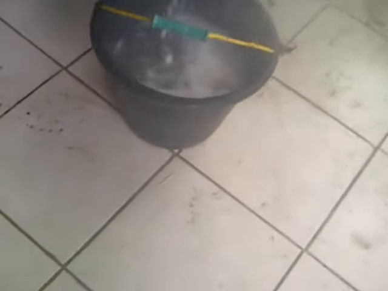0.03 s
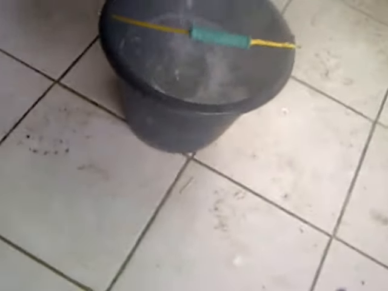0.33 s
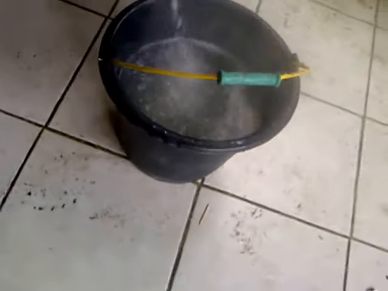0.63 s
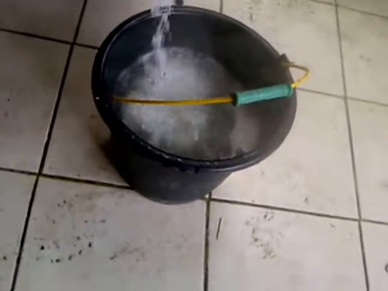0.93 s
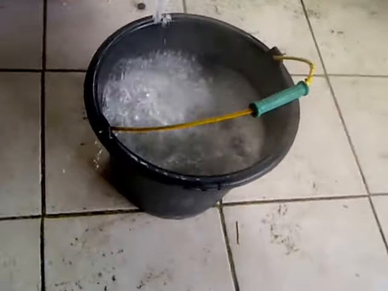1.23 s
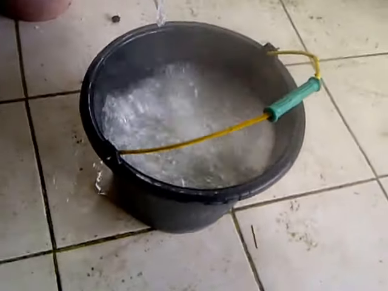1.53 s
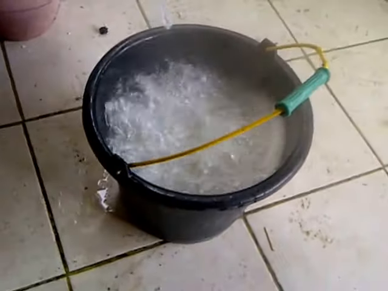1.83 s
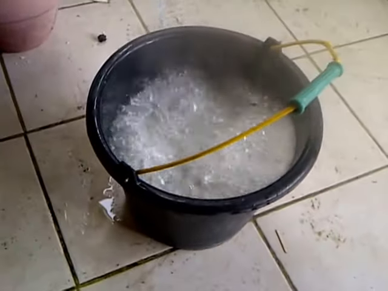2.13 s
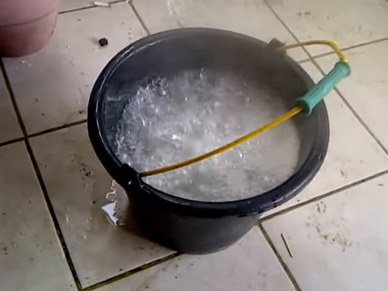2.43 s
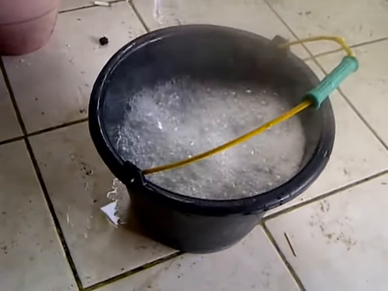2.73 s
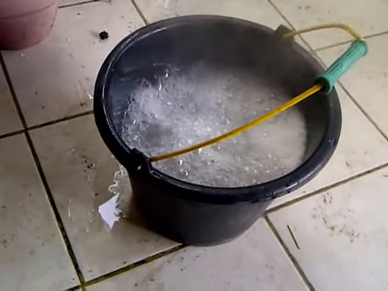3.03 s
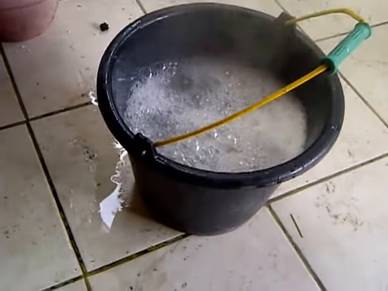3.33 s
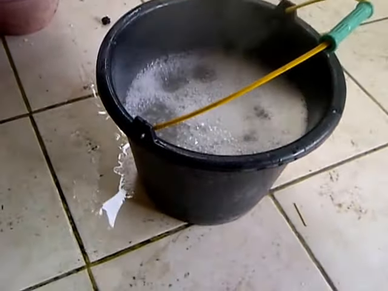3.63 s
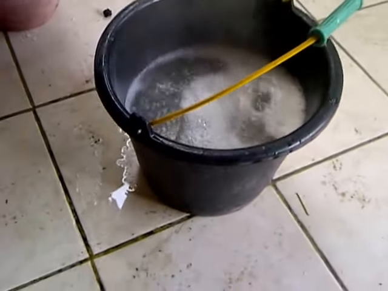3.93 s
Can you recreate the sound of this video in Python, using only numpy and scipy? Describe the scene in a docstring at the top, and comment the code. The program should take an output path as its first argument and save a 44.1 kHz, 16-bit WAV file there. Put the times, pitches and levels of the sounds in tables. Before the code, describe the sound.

Water pours into a plastic bucket, pattering lightly at first while stray drops slap plastic and tile. A hard clack comes at 0.15 seconds, a faint brief whistle at 0.6 and a dull knock at 0.8, the hits echoing briefly in the tiled room. From 1 second the pour swells, bubbling, glugging and fizzing. After 2.4 seconds it thins to a stop, leaving foam sizzling softly until 4 seconds.

```python
"""A stream of steaming water falls into a plastic bucket on a tiled floor: large bubbles churn in its
hollow, drops splash and patter on the wall, foam fizzes in surges. Stray drops slap plastic and tile
throughout. A hard clack comes at 0.15 s, a faint whistle at 0.6 s, a dull knock at 0.8 s; the tiled
room answers the hits briefly. From 1 s the pour swells and glugs. After 2.4 s it thins to a stop
while the settling foam sizzles."""
import sys
import numpy as np
from scipy import signal
from scipy.fft import rfft, irfft
from scipy.io import wavfile

SR = 44100
rng = np.random.default_rng(int(sys.argv[2]) if len(sys.argv) > 2 else 0)


def master_out(mix):
    """Clip the mix to full scale and print it as 16-bit PCM to the path in sys.argv[1]."""
    frames = np.transpose(np.atleast_2d(mix))
    ceiling = np.clip(frames, -1, 1)
    pcm = np.round(ceiling * 32767).astype(np.int16)
    wavfile.write(sys.argv[1], SR, pcm)


N = 176400

# Envelope of churn and gurgle. Each row: time in seconds, relative level in dB.
CHURN_ENVELOPE = [(0.01, -53.5), (0.56, -52.5), (0.98, -42.5), (1.16, -36.5), (1.21, -40), (1.98, -35.5),
                  (2.4, -37), (2.44, -40), (2.52, -42.5), (2.61, -37.5), (2.79, -45.5), (3.02, -41.5),
                  (3.19, -49.5), (3.33, -55.5), (3.86, -55), (4.0, -60)]


def amp(db):
    """Decibels to gain."""
    return 10 ** (np.asarray(db) / 20)


def unit(x):
    """Scales to rms 1."""
    return x / np.sqrt(np.mean(x ** 2) + 1e-20)


def at_hz(points, hz):
    """Interpolates a table along log frequency."""
    f, value = np.transpose(points)
    return np.interp(np.log(hz + 1), np.log(f), value)


def level(envelope):
    """Gain per sample. Each envelope row: time in seconds, level in dB."""
    return amp(np.interp(np.arange(N) / SR, *np.transpose(envelope)))


def add(mix, start_s, sound):
    """Mixes a sound in at start_s."""
    part = mix[max(round(start_s * SR), 0):][:len(sound)]
    part += sound[:len(part)]


def colour(x, spectrum, resonances=()):
    """Shapes the spectrum and lifts resonances; rms 1."""
    hz = np.fft.rfftfreq(N, 1 / SR)
    lift_db = sum(db / (1 + (2 * (hz - centre) / width) ** 2) for centre, width, db in resonances)
    return unit(irfft(rfft(x) * amp(at_hz(spectrum, hz) + lift_db), N))


def sputter(rate_hz, depth_db):
    """Random unevenness of the flow, as a gain."""
    hz = np.fft.rfftfreq(N, 1 / SR)
    band = hz / (rate_hz ** 2 + hz ** 2) / (1 + (hz / rate_hz) ** 2)
    wobble = unit(irfft(rfft(rng.standard_normal(N)) * band, N))
    return unit(amp(depth_db * wobble))


def room(x, wet_db):
    """Adds dense early reflections and a short tail of the tiled room."""
    # Each row: frequency in Hz, T60 in seconds.
    reverb_times = [(250, 0.23), (1000, 0.55), (3000, 0.72), (8000, 0.02)]
    early_s, early_db = 0.012, 14.5
    t = np.arange(SR // 3) / SR
    taps = rng.standard_normal(len(t)) * (1 + amp(early_db) * np.exp(-t / early_s)) * (t > .001)
    hz, frame_s, frames = signal.stft(taps, SR, nperseg=256)
    fall_db = -60 * frame_s / at_hz(reverb_times, hz)[:, None]
    tail = signal.istft(frames * amp(fall_db), SR, nperseg=256)[1]
    return x + amp(wet_db) * signal.fftconvolve(x, tail / np.linalg.norm(tail))[:N]


def diffuse(x, wet_db, decay_s):
    """Reflections of moving sources: a noisy tail that follows their power."""
    pole = np.exp(-2 / (decay_s * SR))
    power = signal.lfilter([1 - pole], [1, -pole], x ** 2)
    return unit(x + amp(wet_db) * np.sqrt(power) * rng.standard_normal(N))


def bubbles(low_hz, high_hz, cycles, rise, spread_db, count, samples):
    """Damped rings of random time, pitch and strength, each gliding up a little."""
    when, pitch, life, strength, polarity = rng.random((count, 5)).T[:, :, None]
    t = np.arange(samples) / SR
    hz = low_hz + (high_hz - low_hz) * pitch
    decay_s = cycles * (.5 + life) / hz
    gain = amp(spread_db * np.minimum(-np.log(1 - strength), 4.5)) / np.sqrt(decay_s)
    age = t / decay_s
    glide = 1 + rise * np.minimum(age, 10)
    rings = gain * np.sign(polarity - .5) * np.exp(-age) * np.sin(2 * np.pi * hz * t * glide)
    places = (when * N).astype(int) + np.arange(samples)
    return unit(np.bincount(places.ravel(), rings.ravel(), N)[:N])


def hollow_pulses(pulses, swell_s):
    """Each pulse is a few cycles that swell and die in the bucket's hollow."""
    out, t = np.zeros(N), np.arange(SR // 20) / SR
    age = t / swell_s
    for start_s, db, hz in pulses:
        add(out, start_s, amp(db) * age * np.exp((1 - age ** 2) / 2) * np.sin(2 * np.pi * hz * t))
    return out


def background():
    """Faint steady noise of the room."""
    # Each row: frequency in Hz, relative gain in dB.
    spectrum = [(25, 12), (60, -8), (130, -19), (250, -2), (480, 1), (900, -12.5), (3300, -22), (8000, -20)]
    return amp(-49) * colour(rng.standard_normal(N), spectrum)


def churn():
    """Large bubbles driven under by the stream sound in the bucket's hollow."""
    # Each row: frequency in Hz, relative gain in dB.
    spectrum = [(30, -25.5), (70, -26.5), (100, -27), (160, -20.5), (240, -10.5), (370, -3), (450, -4),
                (600, -2.5), (780, -3.5), (1000, -8), (1600, -17.5), (4000, -48.5)]
    # Each row: centre in Hz, width in Hz, lift in dB.
    air_modes = [(360, 30, 1), (495, 62, 4.5), (727, 54, 2)]
    swarm = bubbles(211, 1406, cycles=1.47, rise=.012, spread_db=2, count=5000, samples=1000)
    wash = amp(7.5) * rng.standard_normal(N)
    return amp(-1.92) * colour(swarm + wash, spectrum, air_modes) * level(CHURN_ENVELOPE)


def gurgle():
    """Bubbles near the pitch of the bucket's hollow ring longer than the rest."""
    # Each row: frequency in Hz, relative gain in dB.
    spectrum = [(300, -25.5), (470, -7.5), (518, 4), (570, -8.5), (700, -5.5), (900, -22.5)]
    rings = bubbles(436, 688, cycles=4.1, rise=.003, spread_db=2, count=900, samples=3000)
    return amp(-8.5) * colour(rings, spectrum) * level(CHURN_ENVELOPE)


def splash():
    """Drops hit the surface as short ticks; small bubbles ring among them."""
    # Each row: frequency in Hz, relative gain in dB.
    spectrum = [(150, -46.5), (600, -10.5), (1000, -2.5), (1550, -0.5), (1900, -2.5), (2350, -2),
                (2800, -6.5), (3500, -8.5), (4500, -16), (8000, -19.5)]
    # Each row: time in seconds, level in dB.
    envelope = [(0.01, -53.5), (0.12, -51.5), (0.43, -52), (0.98, -46.5), (1.07, -41.5), (1.94, -41),
                (2.17, -42.5), (2.4, -41), (2.5, -44.5), (2.86, -42.5), (2.94, -47.5), (3.17, -49),
                (3.29, -52), (3.63, -59), (3.81, -53.5), (3.96, -58.5), (4.0, -60)]
    ticks = bubbles(600, 4550, cycles=.95, rise=.034, spread_db=4.5, count=9000, samples=256)
    rings = bubbles(800, 4160, cycles=3, rise=.0016, spread_db=-2, count=4000, samples=800)
    mix = diffuse(ticks + amp(-4.5) * rings, wet_db=7.5, decay_s=.028)
    return colour(mix, spectrum) * level(envelope) * sputter(rate_hz=16, depth_db=.64)


def fizz():
    """Tiny foam bubbles burst and fine spray lands, in uneven spurts."""
    # Each row: frequency in Hz, relative gain in dB.
    spectrum = [(300, -14.5), (1500, -14.5), (2600, -3.5), (3400, 1), (4300, 0), (5400, -0.5), (6400, 1),
                (7400, -1.5), (8000, -5.5)]
    # Each row: time in seconds, relative level in dB.
    envelope = [(0.01,-41.5),(0.04,-48.5),(0.13,-46),(0.17,-45),(0.29,-43),(0.35,-49),(0.47,-46),(0.55,-49.5),(0.69,-49.5),(0.725,-44),(0.79,-48.5),(0.98,-46.5),(1.0,-40.5),(1.2,-41),(1.33,-38),(1.38,-43),(1.65,-44),(1.70,-38),(1.75,-47),(1.82,-49),(1.91,-43),(2.0,-47.5),(2.22,-48.5),(2.33,-48.5),(2.58,-51.5),(2.64,-42),(2.70,-54.5),(2.85,-44.5),(2.96,-54),(3.05,-53.5),(3.30,-62),(3.60,-60),(3.645,-50),(3.70,-53),(3.745,-52.5),(3.84,-46.5),(3.91,-63.5),(4.0,-59)]
    # Each row: centre in seconds, relative level in dB, half-width in seconds.
    spurts = [(0.104, -41, 0.0068), (0.228, -40, 0.004), (0.995, -42, 0.0071), (1.055, -39.5, 0.0027),
              (1.489, -42.5, 0.0088), (1.933, -38.5, 0.0036), (2.094, -40.5, 0.0035), (2.162, -43, 0.0053),
              (2.297, -42, 0.0088), (2.343, -41.5, 0.0052), (2.433, -40.5, 0.0048), (3.194, -50, 0.016),
              (3.342, -49.5, 0.0033), (3.46, -54.5, .008), (3.741, -46.5, 0.014), (3.823, -52, 0.016)]
    pops = bubbles(1480, 8450, cycles=.75, rise=.0023, spread_db=3, count=12000, samples=128)
    pops *= sputter(rate_hz=52, depth_db=.5)
    mix = diffuse(pops, wet_db=1.5, decay_s=.012)
    t = np.arange(N) / SR
    spurt_power = sum(amp(db) ** 2 * np.exp(-((t - s) / width_s) ** 2) for s, db, width_s in spurts)
    return amp(1.4) * colour(mix, spectrum) * np.sqrt(level(envelope) ** 2 + spurt_power)


def wall():
    """The stream patters on bare plastic; rising water damps the wall's ringing."""
    # Each row: centre in Hz, width in Hz, lift in dB.
    wall_modes = [(960, 89, 11.5), (1564, 180, 11), (2420, 1400, 10)]
    # Each row: time in seconds, level in dB.
    envelope = [(0, -57), (.45, -54.5), (.7, -56.5), (1.2, -47.5), (1.8, -57), (2.6, -79.5)]
    spectrum_hz_db = [(300, -28), (900, -2.5), (2500, -1.5), (4000, -20.5)]
    patter = bubbles(695, 2800, cycles=.78, rise=.003, spread_db=2.5, count=5000, samples=256)
    return colour(patter, spectrum_hz_db, wall_modes) * level(envelope)


def slaps():
    """Stray drops strike plastic and tile: one short, sharp pulse each."""
    # Each row: start in seconds, relative level in dB, pitch in Hz, decay in ms.
    drops = [(0.1146, -21.5, 3900, 0.29), (.1146, -31.5, 800, 0.65), (0.1326, -36, 3900, 0.32),
             (0.2395, -22, 5430, 0.15), (0.3130, -27.5, 4450, 0.26), (0.9159, -31, 1920, 0.24),
             (1.0847, -25, 2000, 0.058), (1.0859, -21, 2370, 0.45), (1.162, -30, 1090, 1.1),
             (1.5465, -29, 2220, 1), (1.6899, -23, 1800, 0.39), (1.6975, -27, 2670, 0.2),
             (1.7005, -32, 2800, 0.3), (1.7037, -23.5, 2500, 0.38), (1.71, -22, 3600, 0.52),
             (1.905, -27.5, 1640, 0.97), (2.0966, -29.5, 750, 2.1), (2.2628, -28, 1370, 0.57),
             (2.2678, -22.5, 1890, 0.55), (2.3992, -26, 850, 0.58), (2.3997, -29, 3130, 0.7),
             (3.5136, -34, 2070, 0.48), (3.546, -39.5, 1400, 0.69)]
    out, t = np.zeros(N), np.arange(512) / SR
    for start_s, db, hz, decay_ms in drops:
        age = t * 1000 / decay_ms
        push = 2 * age * np.exp(1 - 2 * age) * np.sin(2 * np.pi * hz * t)
        add(out, start_s, amp(db + 2.5) * np.gradient(push) * SR / (2 * np.pi * hz))
    return room(out, wet_db=-8.5)


def clack():
    """One hard clack rings the plastic's short modes, with a small rattle around the hit."""
    # Each row: start in seconds, relative level in dB, treble corner in Hz.
    contacts = [(.1467, -14, 3300), (.1503, 3.3, 3520), (.1517, -16, 12000)]
    # Each row: frequency in Hz, relative level in dB, T60 in seconds.
    modes = [(2820, -1, .0023), (3530, -23, .02), (3970, 0, .0032), (5010, -15, .009), (6580, 5, .0019)]
    rise_s, low_cut_hz = .00015, 3000
    out, t = np.zeros(N), np.arange(SR // 40) / SR
    for start_s, db, corner_hz in contacts:
        ring = sum(amp(mode_db - 60 * t / t60_s) * np.sin(2 * np.pi * hz * t)
                   / (1 + (hz / corner_hz) ** 4) for hz, mode_db, t60_s in modes)
        add(out, start_s, amp(db) * ring * (1 - np.exp(-t / rise_s)))
    thin = signal.sosfilt(signal.butter(3, low_cut_hz, "high", fs=SR, output="sos"), out)
    return room(thin, wet_db=-14)


def whistle():
    """A narrow band of the spray's hiss stands out for a moment."""
    centre_s, sigma_s, pitch_hz, half_width_hz = .61, .02, 2320, 300
    t, hz = np.arange(N) / SR, np.fft.rfftfreq(N, 1 / SR)
    band = np.exp(-((hz - pitch_hz) / half_width_hz) ** 2)
    hiss = unit(irfft(rfft(rng.standard_normal(N)) * band, N))
    return amp(-48) * hiss * np.exp(-((t - centre_s) / sigma_s) ** 2 / 2)


def knock():
    """A dull knock of the bucket, a lighter, higher second blow just after, and the first returns from wall and
    floor."""
    # Each row: start in seconds, peak in dB, pitch in Hz.
    arrivals = [(.8068, -22, 480), (.8185, -36, 760), (.8185, -31.5, 480), (.8268, -34.5, 400),
                (.8325, -37, 420)]
    return room(hollow_pulses(arrivals, swell_s=.0036), wet_db=-10.5)


def glugs():
    """The largest pockets of air stand out from the churning."""
    # Each row: start in seconds, peak in dB, pitch in Hz.
    pockets = [(1.140, -28.5, 552), (1.775, -28.5, 607), (1.838, -30.5, 490), (2.057, -36.5, 396),
               (2.152, -33, 513), (2.578, -34, 510), (2.628, -31, 516), (2.655, -47, 526),
               (3.004, -41, 527)]
    return room(hollow_pulses(pockets, swell_s=.0044), wet_db=-11.5)


def foam():
    """Small bubbles of the settling foam ring in a high band: a sizzle."""
    # Each row: frequency in Hz, relative gain in dB.
    spectrum = [(1500, -34.5), (2800, -7), (3300, -2.5), (3800, -6), (4800, -8.5), (7000, -28)]
    # Each row: time in seconds, level in dB.
    envelope = [(2.3, -76), (2.85, -49), (3.0, -58), (3.45, -59), (3.62, -67), (3.82, -50.5), (3.92, -76)]
    rings = bubbles(2230, 6100, cycles=3.8, rise=.003, spread_db=4.5, count=9000, samples=256)
    return colour(rings, spectrum) * level(envelope)


def scene():
    """Water, hits and room noise in mono."""
    water = churn() + gurgle() + glugs() + splash() + fizz() + foam() + wall()
    return (water + slaps() + clack() + knock() + background() + whistle())[None]


def record(dry):
    """The small microphone loses the bass; the recorder limits the treble."""
    low_cut_hz, high_cut_hz = 199, 7900
    thin = signal.sosfilt(signal.butter(2, low_cut_hz, "high", fs=SR, output="sos"), dry)
    lowpass = signal.firwin(191, high_cut_hz, window=("kaiser", 8), fs=SR)
    return signal.oaconvolve(thin, lowpass[None], "same")


dry = scene()
out = record(dry)
master_out(out)
```